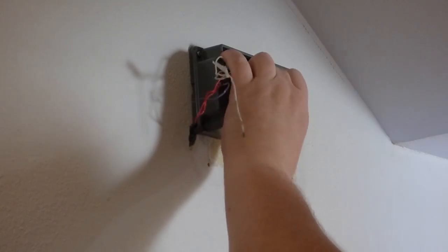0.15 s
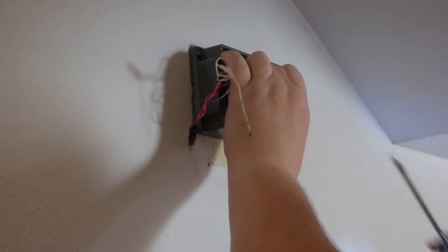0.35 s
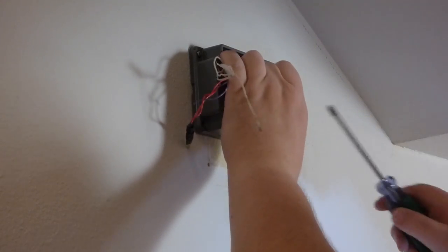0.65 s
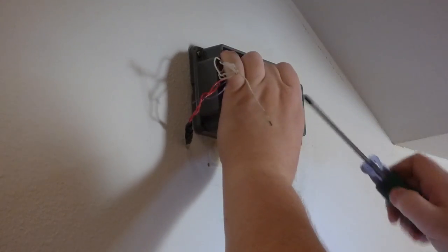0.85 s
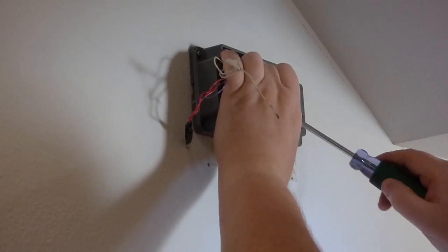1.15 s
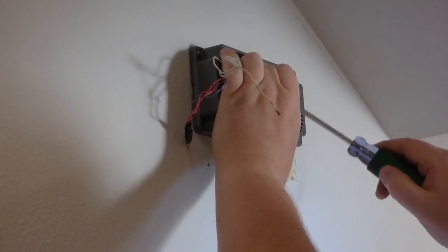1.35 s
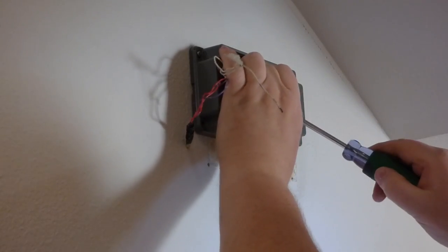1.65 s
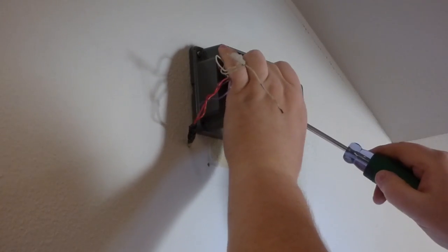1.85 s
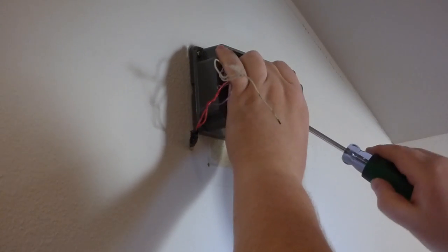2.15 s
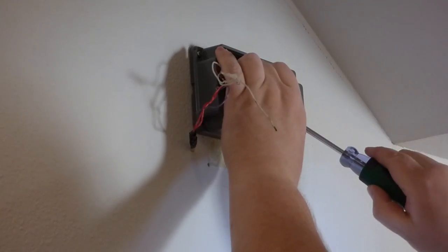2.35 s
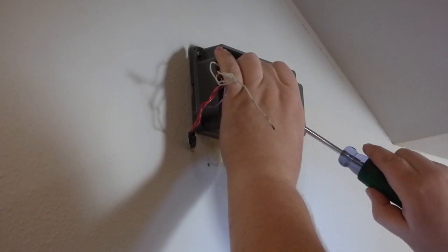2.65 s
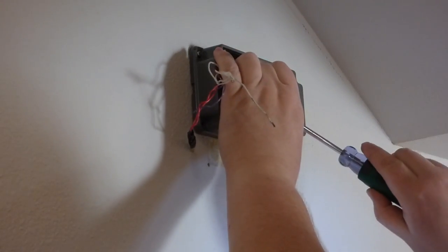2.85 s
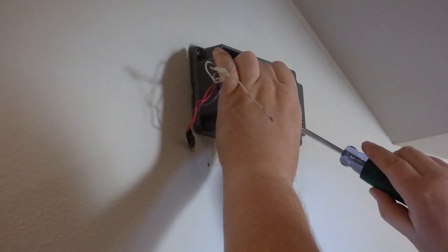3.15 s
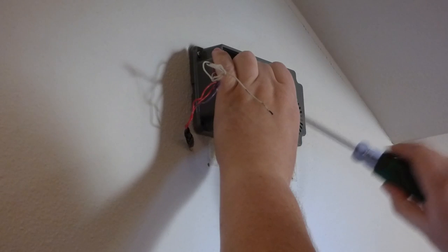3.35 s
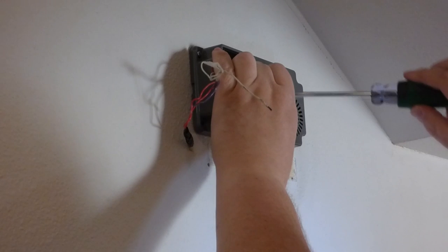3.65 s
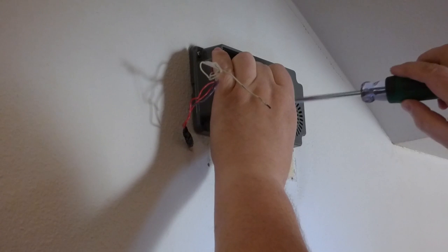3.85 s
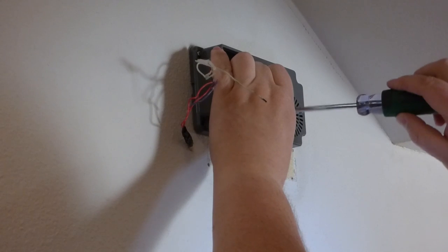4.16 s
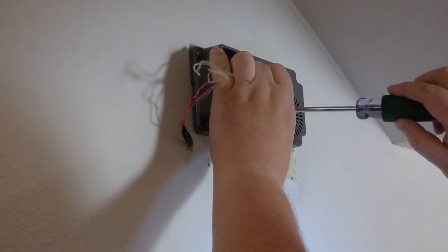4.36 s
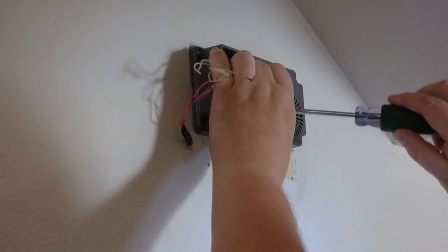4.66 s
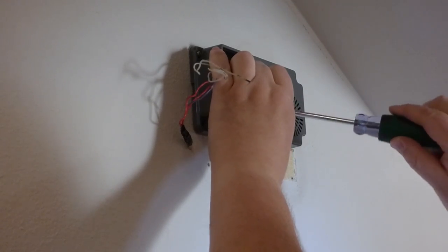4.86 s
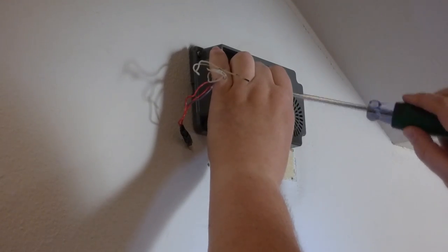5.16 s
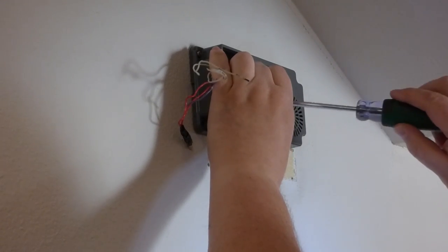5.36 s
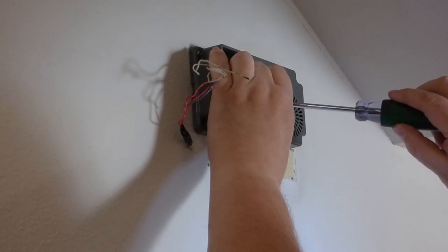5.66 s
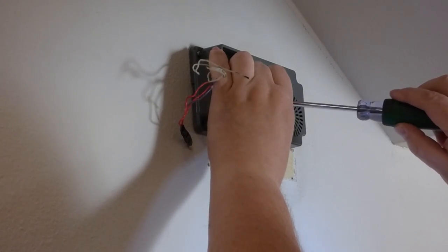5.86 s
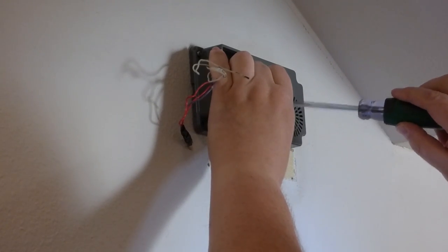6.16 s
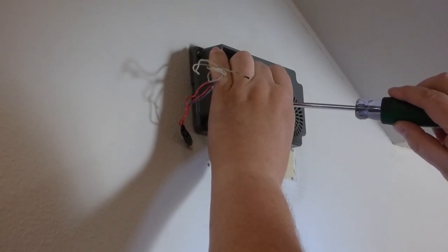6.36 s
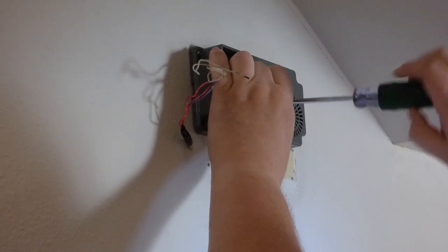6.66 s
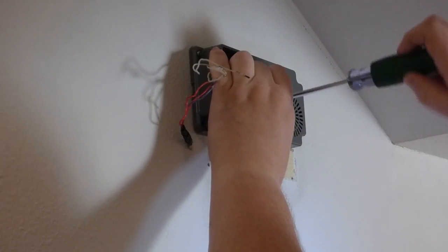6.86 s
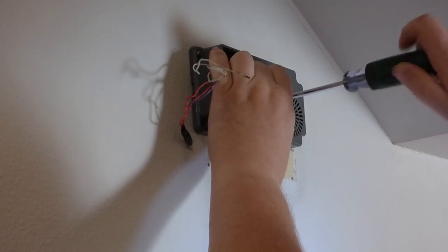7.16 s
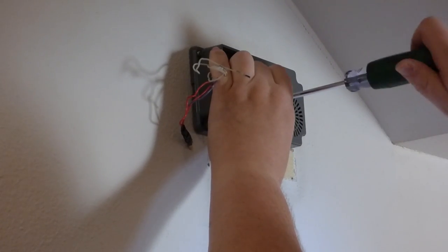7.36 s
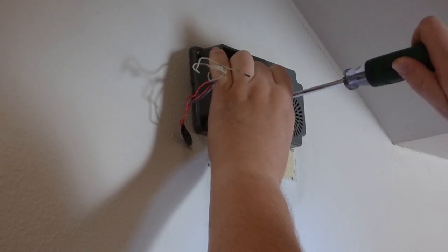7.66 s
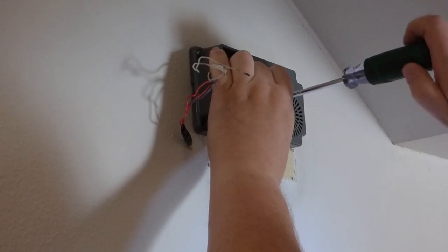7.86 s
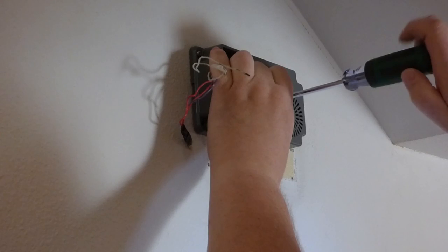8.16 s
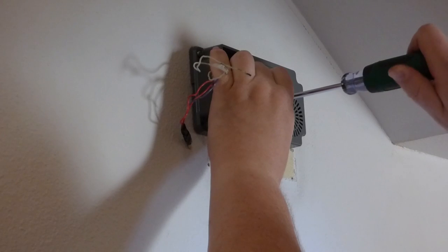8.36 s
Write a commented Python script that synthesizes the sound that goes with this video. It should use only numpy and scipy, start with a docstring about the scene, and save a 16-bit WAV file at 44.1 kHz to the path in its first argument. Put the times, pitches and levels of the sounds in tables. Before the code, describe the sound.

In a bare room, a screwdriver clicks, skids and chatters against screws in a small plastic case, each contact giving a short hollow ring. The touches start lightly, grow louder and busier through the middle, then fade to tiny scrapes as fingers softly turn the handle. The tool sounds near the microphone and slightly to the right, with faint hiss, rumble, a low drone and a thin tone underneath.

```python
"""A screwdriver tip taps, slips and chatters on the screws of a small hollow plastic unit on a wall.
Each contact is a run of tiny jolts that rings the case modes, rattles its panels and ticks.
Fingers brush the handle as they turn it; a hand drags on the case. A bare room answers.
A low drone, a thin tone, rumble and microphone hiss lie underneath."""
import sys
import numpy as np
from scipy import signal
from scipy.fft import rfft, irfft, next_fast_len
from scipy.io import wavfile
from scipy.ndimage import uniform_filter1d

SR = 44100
rng = np.random.default_rng(int(sys.argv[2]) if len(sys.argv) > 2 else 0)


def materialize(psi):
    """Save the field psi as 16-bit PCM at rate SR to the path in sys.argv[1].

    A 1-D psi becomes a single channel; in a 2-D psi each row is a channel.
    """
    bounded = np.clip(np.atleast_2d(psi).T, -1, 1)
    quanta = np.round(bounded * 32767).astype(np.int16)
    wavfile.write(sys.argv[1], SR, quanta)


N = 374585

# Sharp contacts. Each row: start in seconds, level in dB, hardness in dB, favoured pitch in Hz,
# extra low ring in dB.
TAPS = [(0.111, -55.5, 16, 2500, -12), (0.137, -44.5, 5, 578, 1), (0.513, -53.5, 1, 2240, 5),
        (0.544, -50.5, 5.5, 2270, -7), (0.575, -44.5, 13, 534, 4.5), (1.533, -20, 4.5, 1390, 3.5),
        (1.705, -33, -8, 896, 10), (2.093, -49.5, -12, 618, -2), (2.12, -51, 8, 1110, 11.5),
        (2.264, -48, -2, 552, 9), (2.434, -45, 2.5, 1184, 14), (2.945, -30.5, 7, 1676, 2),
        (2.964, -20.5, -6.5, 513, 13.5), (2.981, -22, 7.5, 327, 11.5), (2.992, -29, -26, 1150, -3),
        (3.126, -47.5, 6.5, 1317, -2), (3.17, -42, 8, 620, 9), (3.976, -30, -9, 865, 0),
        (4.094, -38, 14.5, 932, 0), (4.203, -25.5, 3.5, 532, -2.5), (4.333, -35, 2.5, 885, 6.5),
        (4.416, -32.5, 11, 1200, -1), (4.451, -30, -12, 890, 3.5), (4.518, -38, -7, 1143, -3),
        (4.83, -47, -4.5, 1198, 6.5), (5.027, -28.5, -8, 1230, 3), (5.445, -26, -0.5, 1336, 4),
        (5.718, -28.5, 4, 517, 3.5), (5.745, -38.5, 9.5, 970, -16), (6.033, -30, 7, 1213, 10),
        (6.048, -37.5, 10, 1200, 9), (6.119, -32.5, -12.5, 1850, 0.5), (6.28, -29.5, -5, 560, 5.5),
        (7.847, -55.5, 9.5, 1185, 6.5)]
# The tip grinding and slipping. Each row: as in TAPS.
SLIPS = [(0.041, -52.5, -14, 1330, -5), (0.093, -45, -27, 1350, -8), (0.648, -53.5, -29, 780, 9),
         (1.745, -47.5, -25, 770, 3), (2.183, -55.5, -38, 1170, -7), (2.928, -49, -9, 1220, 4),
         (3.004, -33.5, -30, 845, -6), (3.253, -48.5, -14, 1328, 17), (3.988, -33.5, -38, 796, -7.5),
         (4.192, -50, 22, 1234, 15.5), (4.463, -27.5, -16, 545, 0), (5.012, -47, -21, 695, 7),
         (5.034, -42, -8, 1130, -1), (5.653, -47.5, -11.5, 1370, -10), (5.668, -36, -13, 1960, -12),
         (5.684, -32, -19.5, 817, 4), (5.836, -34, -18.5, 1364, 2.5), (5.937, -41, -15, 840, 8.5),
         (5.97, -43, -33, 876, 6), (6.309, -35.5, -35, 930, 8), (6.615, -56.5, 3, 1274, 11),
         (6.93, -48, -16, 1235, 4), (6.955, -51.5, -14, 1240, 7.5), (7.25, -54.5, -23, 1442, 9),
         (7.64, -57, -15, 1270, 7), (7.762, -59.5, -23, 1290, 11), (7.944, -47.5, -9, 1900, -11),
         (7.965, -60, -20, 850, -11), (8.315, -60, -1, 1330, 5)]
# Where the tip works. Each row: start in seconds, low ring in dB, tick in dB, top octave in dB,
# favoured pitch of skids in Hz.
PLACES = [(0, -9, 2, -3, 554), (1.2, -15.5, -4, -5, 990), (2.8, -23.5, -1.5, 5.5, 876),
          (3.7, -6.5, -5.5, -12, 828), (5.3, -11.5, 0, -11, 960), (6.5, -14, -8.5, -23, 1293)]
# Low and mid case modes. Each row: frequency in Hz, level in dB, T60 in seconds.
LOW_MODES = [(147, -10, 0.306), (193, -7.5, 0.12), (277, -10, 0.045), (318.5, -1, 0.067), (352, -5, 0.13),
             (452.3, -4, 0.13), (538, 3, 0.078), (561, -15.5, 0.42), (672, -4, 0.04)]
MID_MODES = [(751, -4, 0.07), (800.4, -12.5, 0.076), (847, -13.5, 0.27), (898, -5.5, 0.17),
             (967, -9, 0.061), (1092, -29, 0.18), (1145, 2.5, 0.031), (1264, -5, 0.03), (1400, 5, 0.0193),
             (1762, -7, 0.03), (1978, -12.5, 0.035), (2163, 4, 0.0143), (2570, -5, 0.01489),
             (2918, 0, 0.0079)]
# Spectra of the dense panel modes, the tick and its top octave. Each row: frequency in Hz, gain in dB.
PANEL_EQ = [(170, -22), (400, -38), (800, -29), (1500, 5), (2600, -8), (3600, -4.5), (7000, -25),
            (14000, -60)]
TICK_EQ = [(800, -29), (2500, 8.5), (3400, -1.5), (4900, 8.5), (6000, 3), (7400, 4), (11000, -76)]
EDGE_EQ = [(6800, -21.5), (8500, -1.5), (10000, -3.5), (12500, -14), (15500, -30)]
# A small case radiates little bass. Each row: frequency in Hz, gain in dB.
RADIATION_EQ = [(30, -9), (100, -15), (146, -10), (210, -9.5), (290, -2)]
# Finger strokes. Each row: centre in seconds, level in dB, half length in ms.
STROKES = [(0.069, -68, 200), (.24, -60, 42), (0.7, -71, 260), (3.36, -66, 36), (3.48, -67.5, 60),
           (6.646, -69.5, 58), (7.062, -63.5, 36), (7.322, -65, 94), (7.441, -63.5, 13), (7.619, -63.5, 59),
           (7.758, -61.5, 18), (7.938, -63, 48), (8.061, -65.5, 24), (8.45, -66.5, 44)]
# Hand shifting on the case. Each row: time in seconds, level in dB.
GRIP_LEVELS = [(0, -61.5), (.25, -72.5), (.41, -61.5), (.445, -78), (.75, -68.5), (1.3, -91), (1.42, -75),
               (6.6, -82.5), (7, -73)]
# Skin dragging on plastic. Each row: frequency in Hz, gain in dB.
RUB_EQ = [(600, -10), (950, 1.5), (1600, 0), (2600, -16.5)]
# Room decay. Each row: frequency in Hz, T60 in seconds.
ROOM_T60 = [(150, 0.4), (500, 0.7), (2000, 0.66), (6000, 0.45), (12000, 0.21)]
# Low drone. Each row: time in seconds, centre in Hz, level in dB.
DRONE = [(0, 332, -78), (.75, 327.4, -71), (1.0, 256.6, -71), (1.45, 258, -63.5), (1.8, 305.4, -73),
         (3.4, 311.4, -72), (3.8, 263.4, -71.5), (4.2, 314.2, -74), (8.1, 314.6, -67.5), (8.49, 299, -83.5)]
# Thin tone that comes and goes. Each row: time in seconds, level in dB.
THIN_LEVELS = [(0, -66), (.33, -63.5), (.45, -84), (3.25, -76), (3.42, -67), (3.75, -81), (4.6, -68),
               (5.0, -62.5), (5.2, -73), (6.4, -75), (7.0, -84)]
# Hiss and rumble: mid spectrum, then side relative to mid. Each row: frequency in Hz, gain in dB.
FLOOR_EQ = [(20, -13.5), (36, -33), (46, -20), (54, -23.5), (178, -26), (249, -21), (398, -29),
            (555, -23.5), (674, -28), (1270, -31), (2770, -38.5), (9900, -39.5), (11400, -38), (15000, -86)]
FLOOR_SIDE_EQ = [(60, -19), (250, -4.5), (600, 1.5), (1500, 1), (4400, -3.5), (12000, -4.5)]

LEAD_SAMPLES = SR // 30  # approach before each contact
TAP_DECAY_MS, SLIP_RISE_MS = 5.34, 5.66
FIRM_DB, FAINT_DB = -29.5, -46
SKID_DELAY_S, SKID_DB, SKID_HARD_DB, SKID_DB_PER_DB = 0.011, -11, -11, 0.41
LOW_DB_PER_DB = -0.12  # lighter contacts sound deeper
EDGE_DB_PER_DB = 0.95  # harder contacts reach higher
SPOT_DB, SPOT_LOG_WIDTH, SPOT_T60_S = 12, 0.069, 0.51
BRUSH_HZ, BRUSH_MS = 8660, 58  # spectral peak of a stroke of this half length
ROOM_DB, WALL_DB, WALL_DECAY_MS, PAN_DB = -9.5, -1.5, 13.7, -1.5
THIN_HZ, FLOOR_DB = 566, -67.5
CUTOFF_HZ, DC_OFFSET = 15400, -0.003


def screwdriver():
    """Taps start at once and die; slips creep in, swell and fade."""
    ms = np.arange(-LEAD_SAMPLES, SR // 12) * 1000 / SR
    after_ms = np.maximum(ms, 0)
    sudden = np.exp(np.minimum(ms, 0) / 0.56 - after_ms / TAP_DECAY_MS)
    taps = contacts(TAPS, sudden, spread_db=3.1, low_db=0, tick_db=-4, tick_slope=0.53)
    creep = 0.43 * np.exp(-np.abs(ms) / 7.8)
    gradual = creep + after_ms / SLIP_RISE_MS * np.exp(1 - after_ms / SLIP_RISE_MS)
    slips = contacts(SLIPS + skids(), gradual, spread_db=2.94, low_db=1, tick_db=-5.5, tick_slope=0.55)
    return colour(taps + slips, RADIATION_EQ)


def skids():
    """The tip skids on after all but faint taps: weaker and duller, and barely after light ones."""
    return [(s + SKID_DELAY_S, db + SKID_DB + SKID_DB_PER_DB * min(db - FIRM_DB, 0),
             hard_db + SKID_HARD_DB, place_at(s)[-1], deep_db)
            for s, db, hard_db, _, deep_db in TAPS if db > FAINT_DB]


def place_at(s):
    """Row of PLACES in force at a time."""
    return [row for row in PLACES if row[0] <= s][-1]


def contacts(rows, envelope, spread_db, low_db, tick_db, tick_slope):
    """Each run of small jolts rings the case, rattles its panels and ticks."""
    out, t = np.zeros(N + SR), np.arange(SR // 3) / SR
    swell = 1 - np.exp(-t / 0.0035)  # the big case walls take time to get moving
    for s, db, hard_db, spot_hz, deep_db in rows:
        jolts = envelope * grit(len(envelope), spread_db)
        jolts /= np.sqrt(np.sum(jolts ** 2))
        _, place_low_db, place_tick_db, edge_db, _ = place_at(s)
        low_gain = undb(place_low_db + low_db + LOW_DB_PER_DB * (db - FIRM_DB) + deep_db)
        mid_ring = 0.37 * case_ring(MID_MODES, t, spot_hz, jolts)
        low_ring = low_gain * swell * case_ring(LOW_MODES, t, spot_hz, jolts)
        hit = signal.fftconvolve(jolts, mid_ring + low_ring)
        panel = colour(jolts, PANEL_EQ) * undb(-3.5)
        tick = colour(jolts, TICK_EQ) * undb(place_tick_db + tick_db + tick_slope * hard_db)
        edge_tilt = [(10500, 0), (13500, edge_db + EDGE_DB_PER_DB * hard_db)]
        edge = colour(colour(jolts, EDGE_EQ), edge_tilt) * undb(hard_db)
        hit[:len(envelope)] += (panel + tick + edge) * np.sqrt(np.sum(envelope ** 2))
        i = int(s * SR) - LEAD_SAMPLES
        out[i:i + len(hit)] += undb(db) * hit
    return out[:N]


def case_ring(modes, t, spot_hz=None, jolts=None, scatter_db=2.65):
    """Damped case modes; the struck spot favours those near one pitch."""
    hz, db, t60_s = np.transpose(modes)[:, :, None]
    damping = np.log(1000) / t60_s
    level_draw, pitch_draw = rng.standard_normal((2, len(modes), 1))
    hz = hz + 0.3135 * pitch_draw * damping  # damped modes shift more from blow to blow
    gain = undb(db + scatter_db * level_draw)
    if spot_hz:
        nearness = np.exp(-(np.log(hz / spot_hz) / SPOT_LOG_WIDTH) ** 2)
        gain = gain * undb(SPOT_DB * np.minimum(SPOT_T60_S / t60_s, 1) * nearness)
    phasor = np.exp(2j * np.pi * hz * t)
    if jolts is not None:  # even out the drive to each mode, however the jolts fall
        drive = np.abs(phasor[:, :len(jolts)] @ jolts)
        gain = gain / (0.36 + drive)[:, None]
    return (gain * np.exp(-damping * t) * phasor.imag).sum(0)


def grit(size, spread_db):
    """Dense tiny impacts of very uneven size."""
    return rng.standard_normal(size) * undb(spread_db * rng.exponential(size=size))


def finger_strokes():
    """Skin brushes handle and case with a fine hiss; quicker is brighter."""
    t, out = np.arange(SR // 2) / SR, np.zeros(N + SR)
    from_centre_ms = (t - t[-1] / 2) * 1000
    for s, db, half_ms in STROKES:
        hz = BRUSH_HZ * (BRUSH_MS / half_ms) ** 0.2
        eq = [(hz / 12, -16), (hz / 4.2, -10), (hz, 0), (min(hz * 1.5, 14000), -5), (15500, -40)]
        hiss = unit(colour(grit(len(t), 3.1), eq))
        i = int(s * SR)
        out[i:i + len(t)] += undb(db) * hiss * np.exp(-(from_centre_ms / half_ms) ** 2)
    return out[len(t) // 2:][:N]


def grip():
    """A shifting grip drags on the case and stirs its low modes."""
    drag = grit(N, 1.6)
    ring = case_ring(LOW_MODES, np.arange(SR // 2) / SR, scatter_db=-3)
    rub = unit(colour(drag, RUB_EQ)) + 0.65 * unit(signal.fftconvolve(drag, ring)[:N])
    return unit(colour(rub, RADIATION_EQ)) * undb(curve(GRIP_LEVELS) + 3.6 * wander(rate_hz=19))


def room(x):
    """A tail that fades band by band, plus quick wall scatter that changes as the hand moves."""
    t = np.arange(SR) / SR
    tail = 0
    for hz in 90 * 2. ** np.arange(8):
        octave = signal.butter(2, [hz / 2 ** .5, hz * 2 ** .5], "bandpass", fs=SR, output="sos")
        band = signal.sosfilt(octave, rng.standard_normal((2, SR)))
        tail = tail + band * np.exp(-np.log(1000) * t / at_hz(ROOM_T60, hz))
    wet = signal.fftconvolve(np.pad(x, (0, SR))[None], tail, axes=1)
    wet *= undb(ROOM_DB) / np.sqrt(np.sum(tail ** 2))
    hop = SR // 10
    fade = np.sin(np.pi * np.arange(2 * hop) / (2 * hop))
    decay = np.exp(-t[:hop] * 1000 / WALL_DECAY_MS)
    decay *= undb(WALL_DB) / np.sqrt(2 * np.sum(decay ** 2))
    for i in range(0, N - 2 * hop, hop):
        scatter = rng.standard_normal((2, hop)) * decay
        echo = signal.fftconvolve((x[i:i + 2 * hop] * fade)[None], scatter, axes=1)
        wet[:, i:i + echo.shape[1]] += echo
    mid = wet[0, :N]
    # close microphones hear the bass alike
    side = colour(wet[1, :N], [(60, -9), (380, -13), (650, -5), (12000, -4.5)])
    return np.array([mid + side, mid - side])


def noise_floor():
    """Steady microphone hiss and rumble."""
    mid = colour(rng.standard_normal(N), FLOOR_EQ)
    side = colour(colour(rng.standard_normal(N), FLOOR_EQ), FLOOR_SIDE_EQ)
    return undb(FLOOR_DB) / np.sqrt(np.mean(mid ** 2)) * np.array([mid + side, mid - side])


def drones():
    """A wavering low drone and a thin tone above it."""
    low = narrow_noise(curve(DRONE), width_hz=45) * undb(curve(DRONE, col=2))
    thin = narrow_noise(THIN_HZ, width_hz=18) * undb(curve(THIN_LEVELS))
    return low + thin


def narrow_noise(hz, width_hz):
    """A band of noise round a pitch, unit RMS."""
    sway = uniform_filter1d(rng.standard_normal((2, N)), int(SR / width_hz), axis=1)
    phase = 2 * np.pi * np.cumsum(hz + np.zeros(N)) / SR
    return unit(sway[0] * np.cos(phase) + sway[1] * np.sin(phase))


def wander(rate_hz):
    """Slewed random steps, spread near 1."""
    hold = int(SR / rate_hz)
    return 1.07 * uniform_filter1d(np.repeat(rng.standard_normal(N // hold + 1), hold), hold)[:N]


def curve(rows, col=1):
    """One column interpolated over time."""
    rows = np.array(rows)
    return np.interp(np.arange(N) / SR, rows[:, 0], rows[:, col])


def colour(x, eq):
    """Filter by (Hz, dB) points."""
    size = next_fast_len(x.shape[-1])
    gain = undb(at_hz(eq, np.fft.rfftfreq(size, 1 / SR)))
    return irfft(rfft(x, size) * gain, size)[..., :x.shape[-1]]


def at_hz(table, hz):
    points_hz, values = np.transpose(table)
    return np.interp(np.log(np.maximum(hz, 1)), np.log(points_hz), values)


def undb(db):
    return 10 ** (np.asarray(db) / 20)


def unit(x):
    return x / np.sqrt(np.mean(x ** 2))


def scene():
    """Tool and hands slightly to the right, in the room, over the background."""
    close = screwdriver() + finger_strokes() + grip()
    pan = undb(np.array([[PAN_DB], [-PAN_DB]]) / 2)
    return close * pan + room(close) + noise_floor() + drones()


def record(dry):
    """The highest treble is cut off, and the signal sits a little off zero."""
    lowpass = signal.ellip(8, .2, 70, CUTOFF_HZ, fs=SR, output="sos")
    return signal.sosfilt(lowpass, dry) + DC_OFFSET


dry = scene()
out = record(dry)
materialize(out)
```